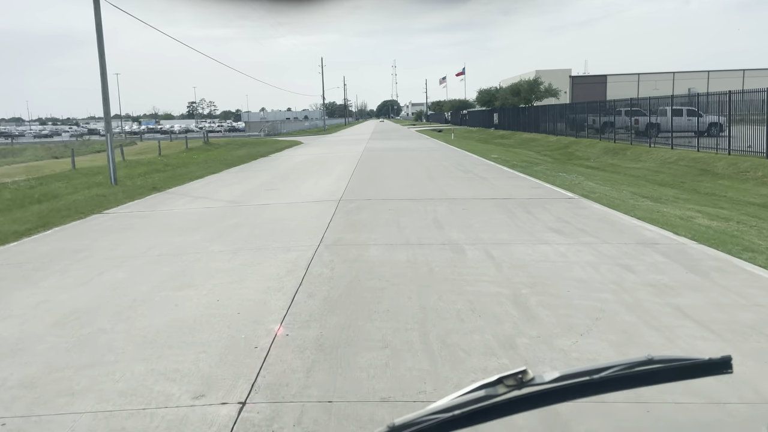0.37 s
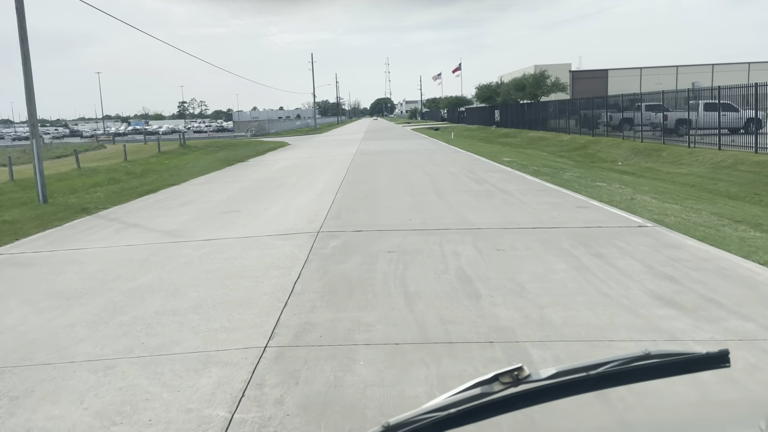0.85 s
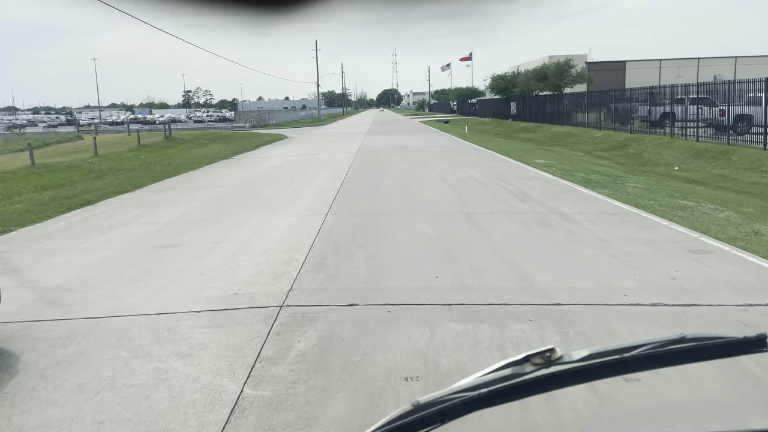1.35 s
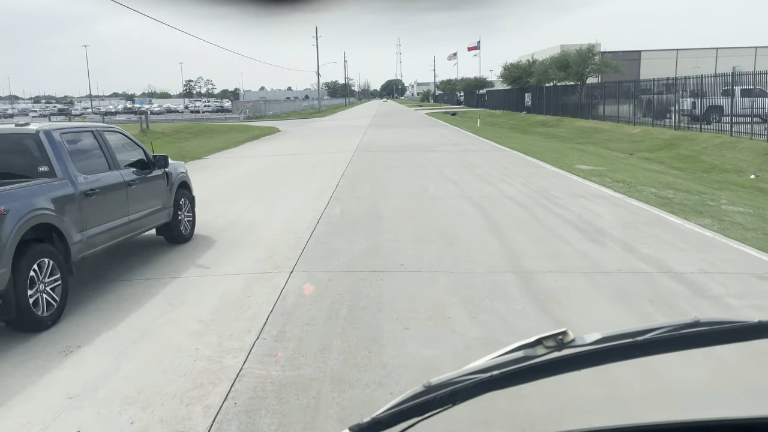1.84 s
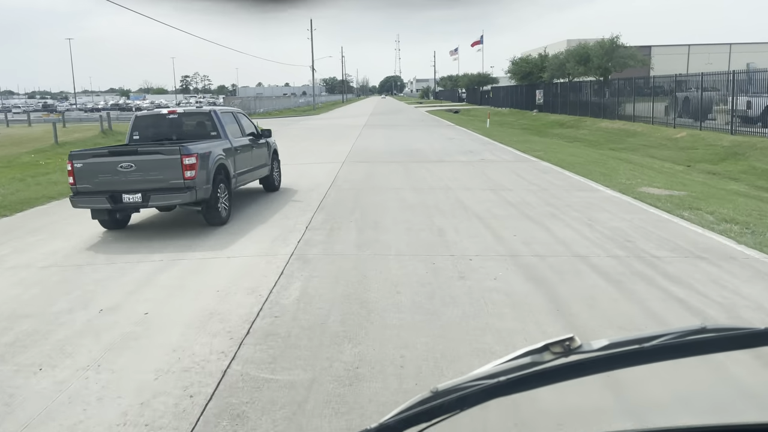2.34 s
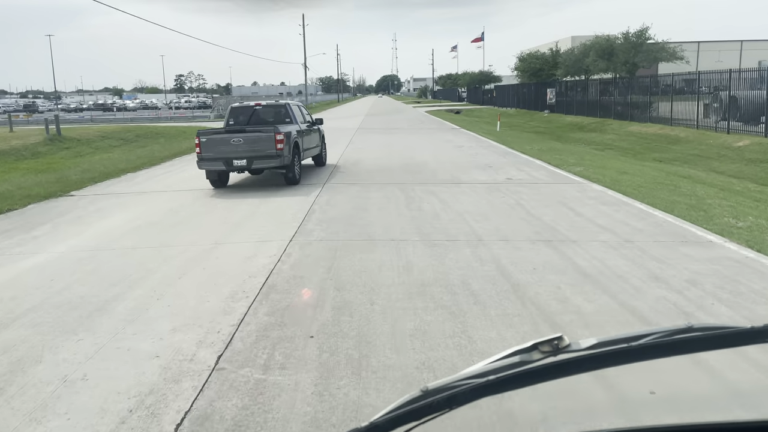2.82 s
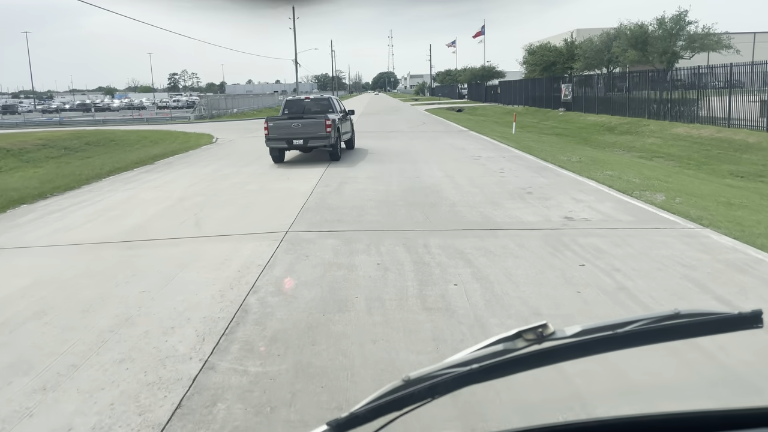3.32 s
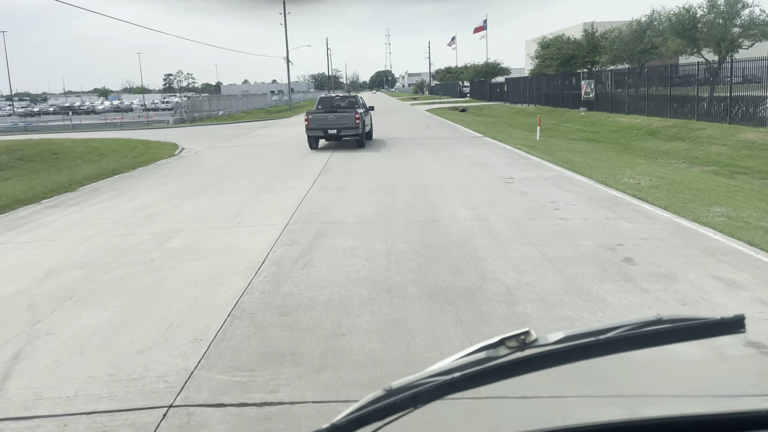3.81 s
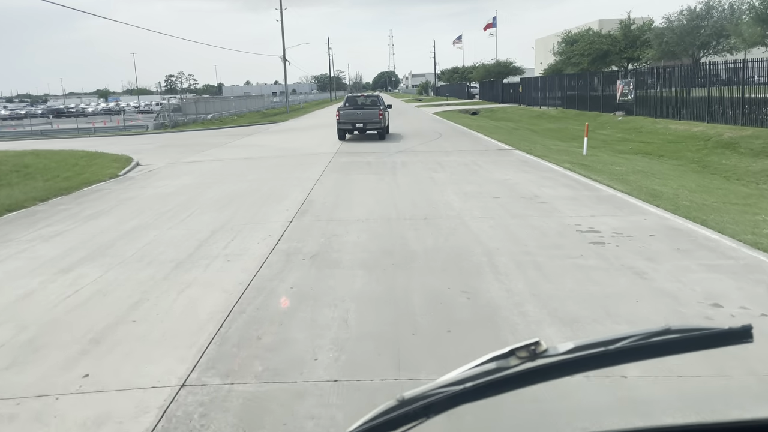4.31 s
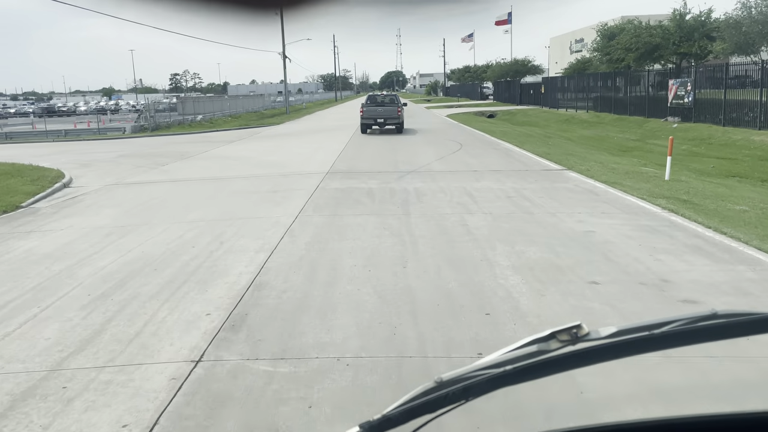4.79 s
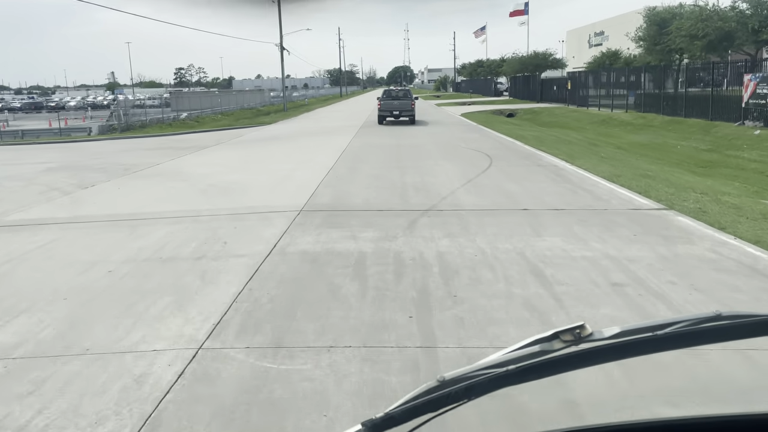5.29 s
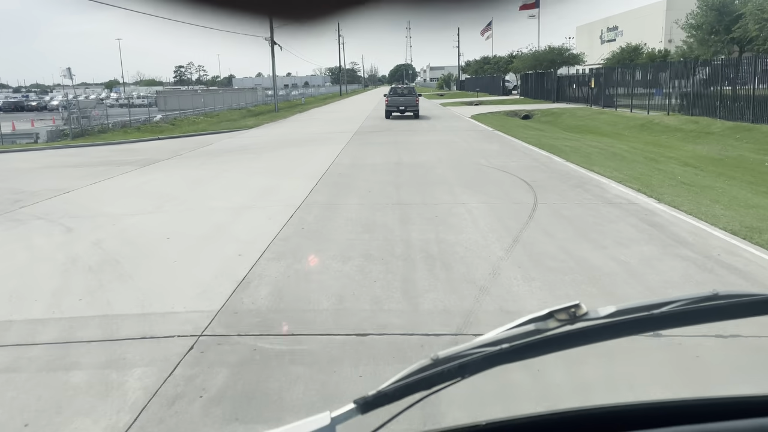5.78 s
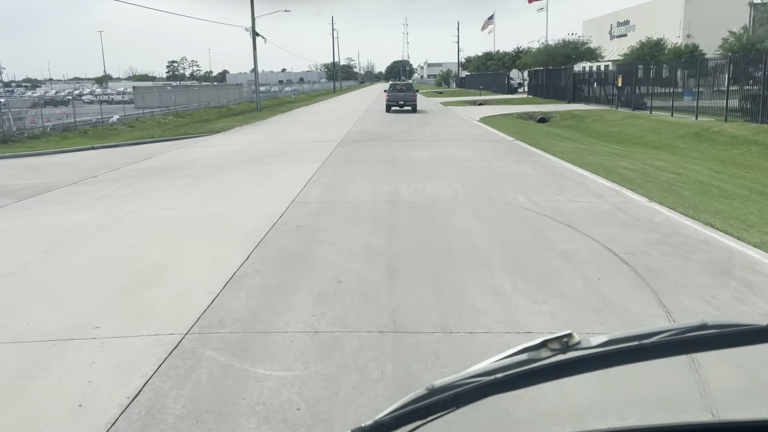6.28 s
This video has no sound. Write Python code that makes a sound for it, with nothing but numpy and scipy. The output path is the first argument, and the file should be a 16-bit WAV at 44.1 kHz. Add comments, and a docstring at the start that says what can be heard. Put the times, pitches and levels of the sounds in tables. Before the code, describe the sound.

A continuous ride inside a truck cab, in close, enclosed stereo. From 0 to 1.5 seconds the six-cylinder engine holds a gruff, buzzing drone near 162 hertz, edging up to about 172, with grainy mechanical clatter and a soft airy fan hiss. Road rumble is heaviest at the very start, then eases and swells again near 1.5. Loose trim ticks and jingles, thin and bright, clustered around 0.4 to 0.7 and 1.0 to 1.7. Near 1.7 the pull slackens for an instant and the pitch glides down, bottoming near 117 hertz at 2.2; hiss and clatter soften with it. From then on a deeper, rounder hum booms through the cab, wavering slightly and climbing slowly to about 135 hertz by 6.6, over muffled rumble and sparser ticks, a few more near the end. It stops still pulling.

```python
"""Truck cab through an upshift

A six-cylinder truck pulls away on a concrete road, heard inside the cab: the engine climbs, drops at one
upshift into the boom of the cab and climbs again. The engine is a sum of sines at orders of its cycle, lifted
by resonances; road rumble, fan hiss and engine clatter are shaped noise. Noise excites the low cab modes,
and loose trim ticks as short bursts of resonant noise."""
import sys
import numpy as np
from scipy import signal
from scipy.fft import rfft, irfft
from scipy.io import wavfile
from scipy.ndimage import uniform_filter1d

SR = 44100
rng = np.random.default_rng(int(sys.argv[2]) if len(sys.argv) > 2 else 0)


def transcribe(signal):
    """Save signal, clipped to [-1, 1], as a 16-bit WAV file at the path in sys.argv[1]."""
    frames = np.atleast_2d(signal).T
    limited = np.clip(frames, -1, 1)
    pcm = np.round(limited * 32767).astype(np.int16)
    wavfile.write(sys.argv[1], SR, pcm)


N = 292824  # length in samples
FIRING = 6  # firings per four-stroke cycle

# strong orders of the four-stroke cycle; 6 is the firing, 7.2 a belt-driven pump: order
STRONG_ORDERS = [3, 5, 6, 7.2, 9, 10, 12, 13, 14, 24, 30, 32, 33, 37, 38, 47, 78]
# the clutch hands over between these times: start t/s, end t/s
SHIFT_TIMES = (1.79, 2.01)
# torque dips while the gears change: t/s, level/dB
TORQUE_DIPS = [(1.67, -0.5), (1.74, -8.5), (1.82, -2.5), (1.9, -0.5)]


def gain_of(db):
    """Level law: decibels to an amplitude factor."""
    return 10 ** (np.asarray(db) / 20)


def evened(x):
    """Normalization by the root mean square, to rms 1."""
    return x / np.sqrt(np.mean(x ** 2) + 1e-20)


def read(points, hz):
    """Linear interpolation of a spectrum on a log-frequency axis."""
    f, value = np.transpose(points)
    return np.interp(np.log(hz + 1), np.log(f + 1), value)


def curves(rows):
    """Linear interpolation in time: every column of a table, one value a sample."""
    s, *columns = np.transpose(rows)
    return [np.interp(np.arange(N) / SR, s, c) for c in columns]


def drift(rate, count):
    """Low-pass random process: slow wander of rms 1, corner at rate (Hz), one row a voice."""
    steps = rng.standard_normal((count, N // 512 + 2))
    pole = np.exp(-2 * np.pi * rate * 512 / SR)
    smooth = evened(signal.lfilter([1], [1, -pole], steps))
    return [np.interp(np.arange(N) / 512, np.arange(len(row)), row) for row in smooth]


def lift_db(hz):
    """Panel resonance: how far the cab panels raise a frequency, in dB."""
    # cab panels that lift what passes them: f/Hz, width/Hz, lift/dB
    panels = [(646, 34, 11), (791, 47, 4), (995, 170, 8.5), (1247, 49, 2)]
    return sum(db / (1 + (2 * (hz - f) / width) ** 2) for f, width, db in panels)


def noise(spectrum, patchy_db, ringing):
    """Partially coherent stereo noise of rms 1, its level drifting in patches of time and frequency."""
    # left-right likeness: f/Hz, correlation
    likeness = [(60, 1), (130, 1), (290, 0.024), (640, 0.064), (1400, -0.28), (3100, 0.044), (6800, -0.015),
                (9000, -0.58), (11000, -.2), (12200, 0.016), (15000, 1)]
    # left-right balance: f/Hz, left minus right level/dB
    balance = [(60, -0.5), (110, 0), (200, -5), (380, -3.5), (700, -2.5), (1290, 3), (2380, 2.5),
               (4400, 5.5), (8120, 6), (15000, -4.5)]
    frames, hz = N // 512 + 5, np.fft.rfftfreq(2048, 1 / SR)
    a, b, c, d, patches = rng.standard_normal((frames, 1025, 5)).T
    patches = uniform_filter1d(patches, size=14, axis=0, mode="wrap")
    patches = evened(uniform_filter1d(patches, size=8, axis=1, mode="wrap"))
    same = np.clip(read(likeness, hz), -1, 1)[:, None]
    left = a + 1j * b
    right = same * left + np.sqrt(1 - same ** 2) * (c + 1j * d)
    lean_db = np.array([.5, -.5])[:, None] * read(balance, hz)
    colour_db = read(spectrum, hz) + ringing * lift_db(hz) + lean_db
    z = np.array([left, right]) * gain_of(colour_db[:, :, None] + patchy_db * patches)
    return evened(signal.istft(z, nperseg=2048, noverlap=1536)[1][:, :N])


def road_rumble():
    """Broadband road excitation: low noise whose level follows a time curve."""
    # relative spectrum of the rumble: f/Hz, level/dB per Hz
    spectrum = [(10, -56.5), (20, -23), (26, -11.5), (35, -4), (60, -1), (85, 1.5), (120, -10.5),
                (170, -14.5), (230, -6.5), (320, -18.5), (500, -29.5), (900, -94.5)]
    # level of the road rumble: t/s, level/dB
    levels = [(0, -20.5), (.6, -33.5), (1.45, -24), (1.7, -27.5), (3, -31.5), (3.4, -29.5), (4.6, -28.5),
              (5.4, -28.5), (6.64, -31.5)]
    return gain_of(curves(levels)[0]) * noise(spectrum, patchy_db=3.7, ringing=0)


def fan_hiss(octaves):
    """Flow noise of fan and intake: its level grows with engine speed (octaves above reference)."""
    # relative spectrum of the hiss: f/Hz, level/dB per Hz
    spectrum = [(880, -28), (1500, -1.5), (3760, -13.5), (5040, -15), (5610, -12.5), (6130, -19),
                (6890, -21), (7520, -28), (8370, -23.5), (9060, -32.5), (9600, -39), (10900, -34),
                (13700, -44), (14600, -39), (15500, -73)]
    return gain_of(-30 + 9.9 * octaves) * noise(spectrum, patchy_db=1.14, ringing=0)


def engine_clatter(octaves, cycle):
    """Amplitude-modulated noise: clatter pulses with the cycle and each firing, lifted by the panels."""
    # relative spectrum of the clatter ahead of the panels: f/Hz, level/dB per Hz
    spectrum = [(60, -73.5), (150, -34.5), (300, -3), (400, -4.5), (520, -6), (660, -5), (780, -5.5),
                (1000, -10.5), (1300, -2.5), (1700, -16), (2400, -18), (5000, -56.5), (9000, -100)]
    cycle_beat, firing_beat = .04, 0.11
    pulse = 1 + cycle_beat * (np.cos(cycle) + np.cos(2 * cycle)) + firing_beat * np.cos(FIRING * cycle)
    return gain_of(-24 + 8 * octaves) * pulse * noise(spectrum, patchy_db=0.73, ringing=0.83)


def boom():
    """Modal excitation: the road shakes the low modes of the cab, nearly alike on both sides."""
    # cab air and floor modes: f/Hz, width/Hz, relative level/dB
    modes = [(86, 21, 0), (135, 38, 4), (333, 30, -1)]
    # road drive into the modes: t/s, level/dB
    drive = [(0, -24), (.5, -27), (1, -28.5), (1.5, -26), (1.85, -26), (2.2, -35.5), (4, -28.5),
             (6.64, -32)]
    hz = np.fft.rfftfreq(N, 1 / SR)
    shape = sum(gain_of(db) / (1 + (2 * (hz - f) / width) ** 2) for f, width, db in modes)
    mid, side = irfft(rfft(rng.standard_normal((2, N))) * shape, N)
    stereo = np.array([0.98 * mid + 0.45 * side, mid - 0.12 * side])
    return gain_of(curves(drive)[0]) * evened(stereo)


def buzz(kicks, modes, t60, rise):
    """Impulse response with 60 dB decay time t60 (s): each kick starts noise in a few wide resonances."""
    t = np.arange(SR // 4) / SR
    decay = gain_of(-60 * t / t60) * (1 - np.exp(-t / rise))
    burst = signal.oaconvolve(kicks, decay)[:N] * rng.standard_normal(N)
    hz = np.fft.rfftfreq(N, 1 / SR)
    colour = sum(gain_of(db) * np.exp(-.5 * (2 * (hz - f) / width) ** 2) for f, width, db in modes)
    return irfft(rfft(burst) * colour, N)


def trim_ticks():
    """Impact excitation: loose trim jingles and knocks at larger bumps and chatters faintly at random."""
    # loose trim knocking over slab joints: t/s, kick level/dB ahead of the resonances
    knocks = [(0.0453, -40.5), (0.37, -36.5), (0.4866, -39.5), (0.5252, -35), (0.5636, -35), (0.6, -41),
              (0.6389, -41.5), (0.6769, -43), (0.7088, -47.5), (1.035, -37.5), (1.131, -43),
              (1.1672, -45.5), (1.2381, -38.5), (1.3189, -41), (1.354, -33.5), (1.3956, -43),
              (1.4341, -38.5), (1.5264, -39.5), (1.5604, -39.5), (1.669, -39), (1.936, -40), (2.1874, -41),
              (2.2982, -40), (2.3545, -45), (2.4284, -40.5), (2.5082, -47.5), (2.9497, -49),
              (3.1571, -41.5), (3.1956, -44), (3.69, -44), (4.0777, -42.5), (4.636, -44), (4.6982, -38.5),
              (4.8968, -47.5), (5.0549, -39.5), (5.3672, -45), (5.431, -44), (5.483, -37), (5.5293, -43.5),
              (5.8007, -44), (6.1764, -47), (6.2492, -44.5), (6.3008, -39), (6.386, -38), (6.549, -35.5)]
    # bright jingle: f/Hz, width/Hz, level/dB
    jingle_modes = [(13630, 1300, 4), (11000, 4500, -13.5)]
    # duller knock: f/Hz, width/Hz, level/dB
    body_modes = [(8800, 910, 1), (6940, 1500, 11.5), (9600, 1400, -15.5)]
    faint_db, faint_per_s = -56.0, 20.  # weakest faint kick, mean rate
    chance, size = rng.random(N), np.minimum(rng.exponential(1, N), 3)
    faint = (chance < faint_per_s / SR) * gain_of(faint_db + 3 * size)
    bumps = np.zeros(N)
    for s, db in knocks:
        bumps[round(s * SR)] += gain_of(db)
    jingle = buzz(bumps + faint, jingle_modes, t60=0.092, rise=.001)
    return jingle + gain_of(-5.0) * buzz(bumps, body_modes, t60=0.2, rise=0.0015)


def cab_db(hz):
    """Cab resonance: how far a strong order is raised, in dB; flat-topped, steep-sided."""
    # cab resonances that the strong orders swell in as they sweep through: f/Hz, width/Hz, lift/dB
    resonances = [(81, 9, 9.5), (125, 30.7, 6), (144.17, 10, 5.5), (265.2, 30, 14.5), (328.6, 11, 9.5),
                  (659, 23, 14), (707, 30, 20), (792, 32, 14), (1656, 240, 9)]
    return sum(db / (1 + (2 * (hz - f) / width) ** 6) for f, width, db in resonances)


def order_tone(cycle, order, db, lean_db, lead):
    """Order analysis: one sine locked to the engine cycle, reaching the two microphones unequally."""
    turn = order * cycle + 2 * np.pi * rng.random()
    left = gain_of(db + lean_db / 2) * np.cos(turn + lead)
    right = gain_of(db - lean_db / 2) * np.cos(turn)
    return np.sqrt(2) * np.array([left, right])


def gear_blend():
    """Linear crossfade between the gears: 0 in the low gear, 1 in the high gear."""
    return np.interp(np.arange(N) / SR, SHIFT_TIMES, (0, 1))


def weak_orders(cycle_hz, cycle):
    """Broken symmetry: unequal cylinders leave weak orders between the strong ones, lifted by the panels."""
    # mean level of the weak orders ahead of the panels: order, level/dB
    mean_levels = [(4, -40), (12, -45.5), (24, -46), (32, -48.5), (42, -48), (52, -50.5), (65, -51.5)]
    spread_db, balance_db, waver_db = 2., 3.5, 4.  # scatter per gear, left-right scatter, wander
    orders = [k for k in range(4, 66) if k not in STRONG_ORDERS]
    out, high_gear = np.zeros((2, N)), gear_blend()
    torque_db, = curves(TORQUE_DIPS)
    wavers = drift(rate=3.5, count=len(orders))
    scatter = rng.standard_normal((len(orders), 4))
    for order, (low, high, lean, lead), waver in zip(orders, scatter, wavers):
        panel_db = np.repeat(lift_db(order * cycle_hz[::64]), 64)[:N]
        db = np.interp(order, *np.transpose(mean_levels)) + spread_db * (low + (high - low) * high_gear)
        db = db + torque_db + waver_db * waver + panel_db
        out += order_tone(cycle, order, db, balance_db * lean, 2 * lead)
    return out


def strong_orders(cycle_hz, cycle):
    """Harmonic excitation swept through resonances: the strong orders waver and swell in the cab."""
    # per strong order ahead of the cab resonances, low gear then high gear:
    # level/dB, left minus right level/dB, left lead/rad, level/dB, left minus right level/dB, left lead/rad
    places = [(-36.5, -2.5, -0.1, -35, 0.5, 0), (-44.5, 3, 1.5, -37.5, 3.5, 0),
              (-39.5, -3, 0.8, -20, -3, 0.11), (-33, -11.5, 0.5, -36.5, -3, 0.9),
              (-33.5, 0.5, -1, -47.5, 1, 1), (-40, -4, 2, -45, 2.5, 0), (-38, 5, 4, -39, 3, 0.55),
              (-38, 11.5, 1.5, -51, 7.5, -1.5), (-38, 3, -0.5, -52, -0.5, 1),
              (-49.5, 3, 2.5, -47.5, 3, 2.5), (-48, 13, 3.5, -45.5, -3, -1.0),
              (-54, -8, 0, -51, -0.5, -2.5), (-48.5, 9.5, -3.5, -54.5, -2.5, -1.5),
              (-35.5, 5, -1.5, -52, -5, -6), (-50.5, -1, -5, -51, -7, -2.5),
              (-39.5, -1, 0.3, -52.5, 1, -0.3), (-43, -1, -2, -49.5, -1, -1.4)]
    # how much each strong order wavers: rms level/dB
    waver_levels = [2, 3, .8, 2.5, 1.2, 3, 1.3, 3, 3, 3, 2.5, 3, 3, 3, 3, 3, 3]
    out, high_gear = np.zeros((2, N)), gear_blend()
    torque_db, = curves(TORQUE_DIPS)
    wavers = drift(rate=5.4, count=len(STRONG_ORDERS))
    for order, place, waver_db, waver in zip(STRONG_ORDERS, places, waver_levels, wavers):
        db, lean_db, lead = (low + (high - low) * high_gear for low, high in zip(place[:3], place[3:]))
        resonance_db = np.repeat(cab_db(order * cycle_hz[::64]), 64)[:N]
        db = db + resonance_db + torque_db + waver_db * waver
        out += order_tone(cycle, order, db, lean_db, lead)
    return out


def scene():
    """Superposition of road, airflow, trim and engine, the engine layers sharing one phase."""
    # engine speed: t/s, firing f/Hz
    speed = [(0, 161.9), (0.3, 161.8), (0.6, 165.1), (0.9, 168.1), (1.3, 170.5), (1.5, 172.5),
             (1.62, 171.6), (1.72, 165.9), (1.82, 148.7), (1.92, 136.5), (2.08, 125.2), (2.16, 119.3),
             (2.24, 117.2), (2.32, 118.9), (2.6, 119.5), (3.2, 122.1), (3.8, 123.9), (4.7, 127.8),
             (6.64, 135.6)]
    firing_hz, = curves(speed)
    firing_hz = firing_hz * (1 + 0.00107 * drift(rate=3.28, count=1)[0])  # the crank never turns quite evenly
    cycle_hz = firing_hz / FIRING
    cycle = 2 * np.pi * np.cumsum(cycle_hz) / SR
    octaves = np.log2(firing_hz / 140)  # relative to a firing rate of 140 Hz
    background = road_rumble() + fan_hiss(octaves) + engine_clatter(octaves, cycle) + boom() + trim_ticks()
    return background + weak_orders(cycle_hz, cycle) + strong_orders(cycle_hz, cycle)


def roll_off(x):
    """The treble ends steeply here."""
    return signal.sosfilt(signal.butter(12, 15680, fs=SR, output="sos"), x)


def record(dry):
    """Linear filtering, then saturation: microphone colour and low cut, a soft ceiling on the peaks."""
    # the microphone ports cancel these bands: f/Hz, width/Hz, level/dB
    notches = [(5610, 310, -13.5), (7480, 300, -5.5)]
    low_cut_hz, ceiling = 16.0, 1.1
    hz = np.fft.rfftfreq(N, 1 / SR)
    colour = gain_of(sum(db * np.exp(-.5 * (2 * (hz - f) / width) ** 2) for f, width, db in notches))
    low_cut = 1 / np.sqrt(1 + (low_cut_hz / (hz + 1)) ** 6)
    coloured = irfft(rfft(dry) * colour * low_cut, N)
    mix = ceiling * np.tanh(coloured / ceiling)
    return roll_off(mix)


dry = scene()
out = record(dry)
transcribe(out)
```